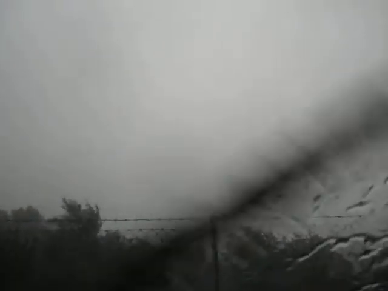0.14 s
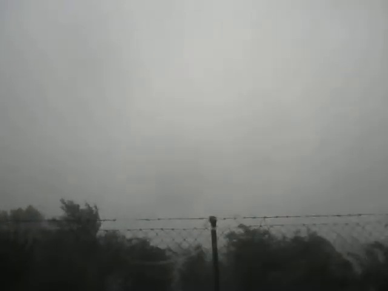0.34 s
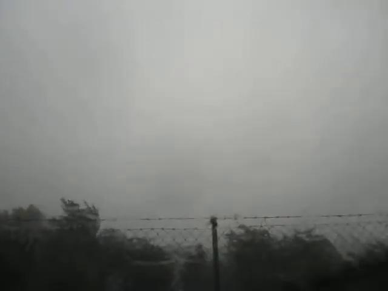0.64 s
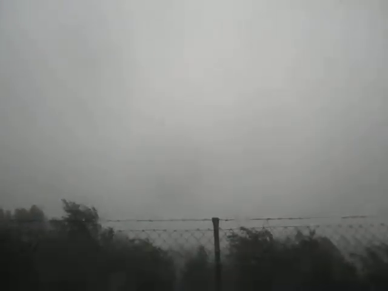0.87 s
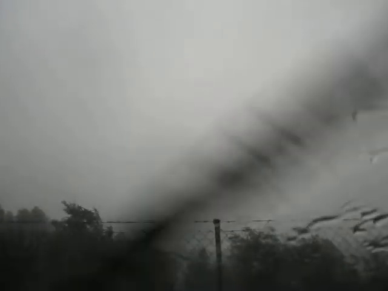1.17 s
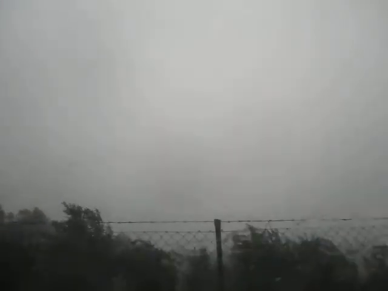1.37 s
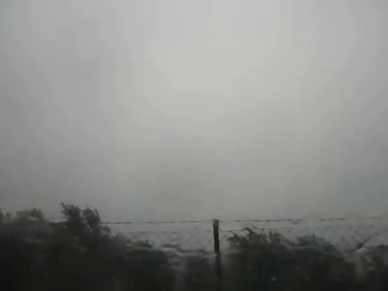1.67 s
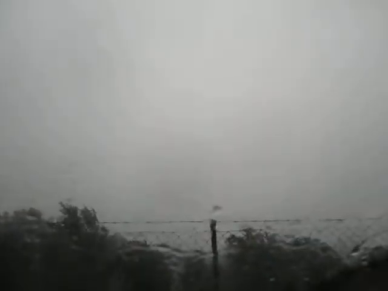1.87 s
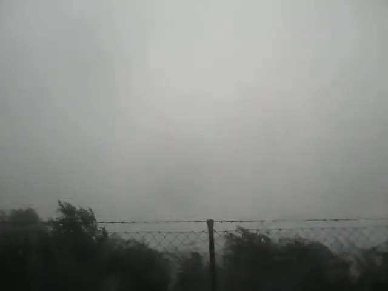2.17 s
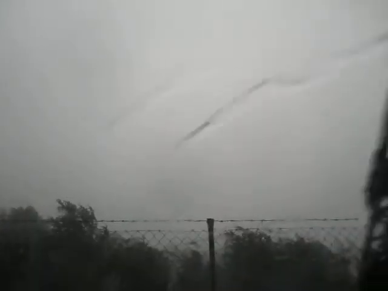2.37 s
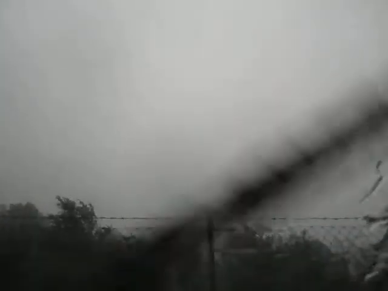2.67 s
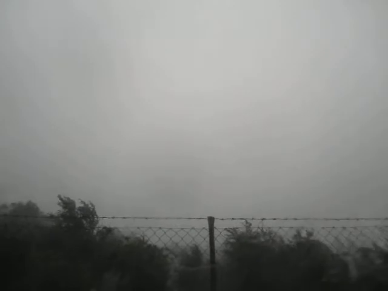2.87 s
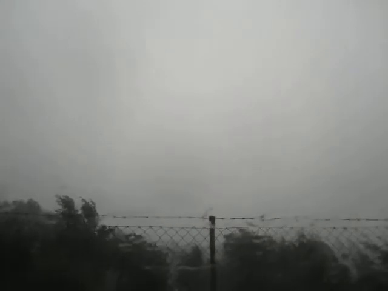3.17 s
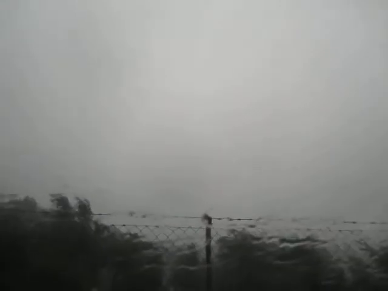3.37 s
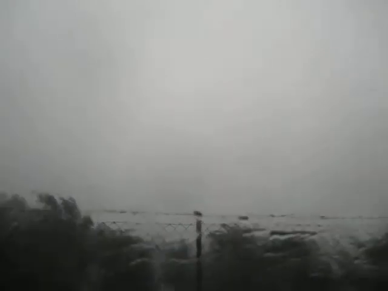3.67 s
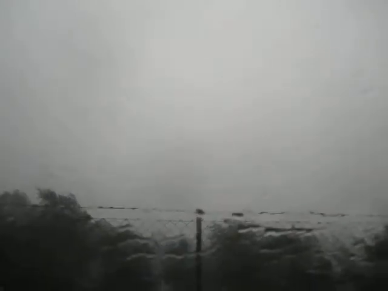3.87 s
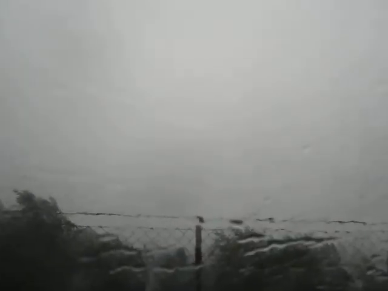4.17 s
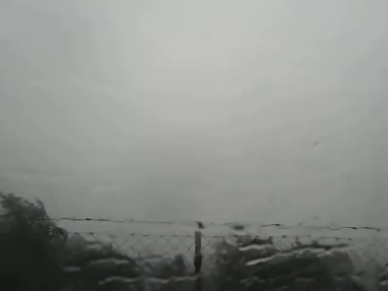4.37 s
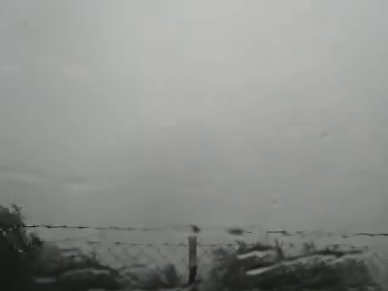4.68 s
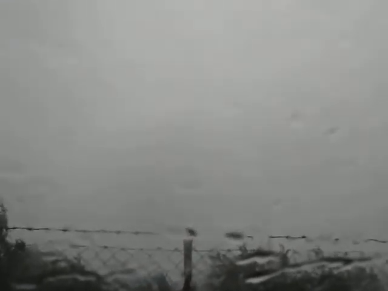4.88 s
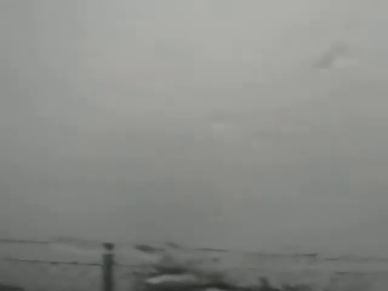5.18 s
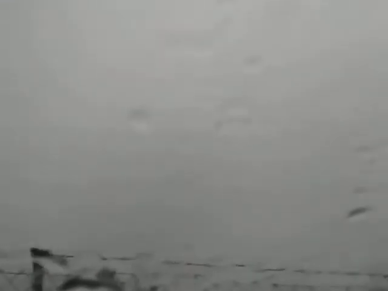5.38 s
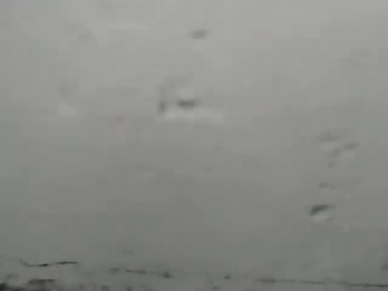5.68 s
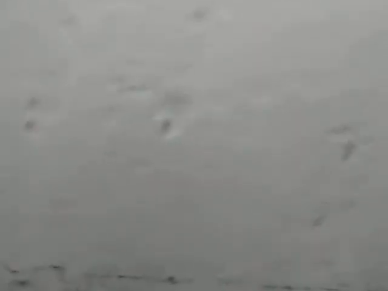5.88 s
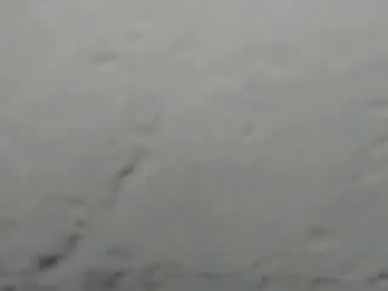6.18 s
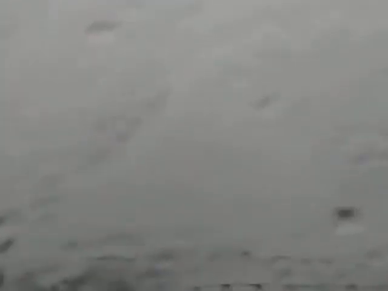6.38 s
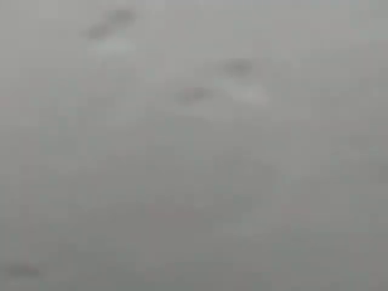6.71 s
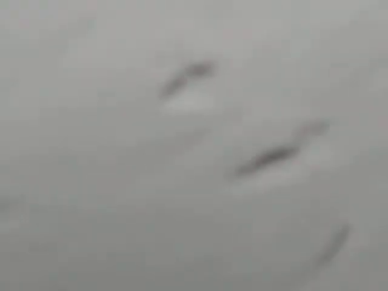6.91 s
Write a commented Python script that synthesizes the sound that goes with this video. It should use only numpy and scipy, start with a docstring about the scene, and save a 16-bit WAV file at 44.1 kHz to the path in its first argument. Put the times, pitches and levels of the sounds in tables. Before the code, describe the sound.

Inside a car, sheets of rain drum on glass and roof while rumbling gusts build into harsh, distorted blasts on the microphone.

```python
"""A storm from inside a parked car, the microphone in the cabin. Sheets of rain drum on glass and roof
while gusts rumble round the body and now and then flutter on the microphone. Near 3.5 s heavy drops smack
down close by and wind overloads the microphone in blunt pops that choke the storm. The rain's sound ducks,
leaving a narrow, dull hiss and two knocks on the trim. Harder blasts break in at 5 and 6 s; with one more
knock and a few last drops, the rain's sound slowly comes back up."""
import sys
import numpy as np
from scipy import signal
from scipy.fft import rfft, irfft
from scipy.io import wavfile
from scipy.ndimage import uniform_filter1d

SR = 44100
rng = np.random.default_rng(int(sys.argv[2]) if len(sys.argv) > 2 else 0)


def digitize_waveform(pressure):
    """Quantize a signal to 16-bit integers and store it at the path in sys.argv[1].

    Rows of a 2-D input are taken as channels; values are limited to [-1, 1].
    """
    field = np.atleast_2d(pressure).T
    bounded = np.clip(field, -1, 1)
    quanta = np.round(bounded * 32767).astype(np.int16)
    wavfile.write(sys.argv[1], SR, quanta)


N = 310772
T = np.arange(N) / SR
FREQS = np.maximum(np.arange(N // 2 + 1) * SR / N, 1)


def rain(drops_per_s=3500, size_spread_db=3.0, patter_share=0.42, spray_hz=2100, steady_spray_db=-12):
    """Overhead, countless drops and their wash ring glass and roof; fine spray brightens the sheets."""
    # the rain's sound, ducking after each hard blast and coming back up: (time [s], relative level [dB])
    levels = [(0, -41.5), (1.0, -38), (1.75, -40), (2.2, -45), (2.6, -37), (3.05, -38), (3.2, -41),
              (3.48, -42.5), (3.65, -56), (4.15, -55.5), (4.6, -54), (5.12, -36.5), (5.28, -63),
              (5.42, -63.5), (5.6, -56), (5.9, -49.5), (6.48, -61), (6.8, -56)]
    # sheets thrown on the glass: (peak time [s], rise [s], fall [s], relative roar [dB], spray [dB])
    sheets = [(.08, 0.12, 0.27, -42.5, -52.5), (.73, 0.13, 0.094, -37, -46.5),
              (1.17, 0.038, 0.038, -39, -44), (1.31, 0.17, 0.19, -38, -47), (1.59, 0.074, 0.15, -37.5, -44),
              (1.73, 0.038, 0.043, -36, -54), (2.35, 0.095, 0.16, -38, -45), (2.49, 0.16, 0.14, -37, -47),
              (2.87, 0.075, .13, -48.5, -49), (5.01, 0.049, .07, -38.5, -47.5),
              (6.991, 0.1, 0.29, -48, -56)]
    # rain as heard in the cabin: (frequency [Hz], gain [dB])
    rain_colour = [(170, -11), (230, -1), (300, -3), (565, -1), (686, -9.5), (800, -6.5), (1120, -5),
                   (1550, -12.5), (2310, -22), (3230, -13.5), (4440, -26), (5480, -31), (7500, -37),
                   (10500, -42), (15500, -66.5)]
    # resonances of glass and roof: (frequency [Hz], width [Hz], boost [dB])
    panels = [(408, 30, 4.5), (593, 140, 2), (784, 210, 3.5), (1163, 99, 4.5), (1833, 480, 4.5),
              (3270, 410, 1.5), (4460, 470, 8), (6280, 720, 5.5)]
    hits = (rng.random(N) < drops_per_s / SR) * rng.standard_normal(N)
    sizes = undb(size_spread_db * np.minimum(rng.exponential(size=N), 4))
    drive = patter_share * unit(hits * sizes) + rng.standard_normal(N)
    resonance_db = sum(db / (1 + (2 * (FREQS - hz) / width) ** 2) for hz, width, db in panels)
    body = colour(rain_colour) * undb(resonance_db)
    treble = 1 / (1 + (spray_hz / FREQS) ** 6)
    roar = shaped(drive, body * (1 - treble)) * undb(2.5 + 0.58 * walk(51))  # both flicker slightly
    spray = shaped(drive, body * treble) * undb(0.92 * walk(39))
    *_, roar_db, spray_db = np.transpose(sheets)
    swells = [swell(s, rise, fall) for s, rise, fall, *_ in sheets]
    steady = undb(curve(levels))
    roar *= strength(swells, roar_db, steady)
    spray *= strength(swells, spray_db, steady * undb(steady_spray_db))
    return roar + spray


def wind(fall_per_rise=1.45):
    """Gusts shake the car's body and boom in the cabin, dying away more slowly than they build."""
    # wind heard under the gusts: (time [s], rumble [dB], cabin boom [dB])
    steady = [(0, -38, -36.5), (.7, -35.5, -33), (1.4, -35, -33.5), (2.2, -39.5, -38), (2.7, -36, -36.5),
              (3.3, -42.5, -35.5), (3.8, -42.5, -48.5), (4.2, -41.5, -48), (4.55, -40.5, -39.5),
              (4.95, -37.5, -44), (5.33, -59, -51), (5.7, -57.5, -55.5), (5.9, -48, -41.5),
              (6.55, -48, -51), (6.8, -45, -49), (7.05, -41, -46.5)]
    # gusts that shove the body: (peak time [s], rise [s], rumble [dB], cabin boom [dB])
    gusts = [(.03, 0.045, -21.5, -31.5), (.52, 0.036, -36, -29.5), (1.064, 0.037, -21.5, -28.5),
             (1.43, 0.021, -21, -29), (1.52, 0.033, -25.5, -42), (1.66, 0.069, -23, -28),
             (1.8, 0.12, -30, -23.5), (1.98, 0.025, -32.5, -24), (2.36, .035, -27.5, -26.5),
             (2.47, 0.062, -26, -31.5), (3.079, 0.018, -34, -27), (3.383, 0.027, -19.5, -39),
             (3.47, 0.062, -22, -44), (3.61, 0.047, -28.5, -31.5), (3.71, 0.019, -27, -55),
             (3.81, 0.064, -34.5, -53), (4.452, 0.017, -28, -33), (5.055, 0.018, -31, -25.5),
             (5.135, 0.032, -27, -23), (5.235, 0.015, -26, -32), (5.545, 0.028, -39, -36),
             (5.98, 0.061, -20, -17.5), (6.18, .04, -24, -32), (6.29, 0.053, -25.5, -28.5),
             (6.635, 0.028, -32, -46.5), (6.73, 0.038, -38, -45)]
    # the shaking body and the booming cabin: (frequency [Hz], gain [dB])
    rumble_colour = [(12, -25.5), (22, 7.5), (36, 4.5), (55, -2.5), (85, -13), (140, -24.5)]
    boom_colour = [(55, -4.5), (80, 0), (105, -0.5), (135, -0.5), (172, 0.5), (205, -4.5), (260, -16),
                   (450, -27)]
    *_, rumble_db, boom_db = np.transpose(gusts)
    swells = [swell(s, rise, fall_per_rise * rise) for s, rise, *_ in gusts]
    rumble = steadied(noise(rumble_colour), 0.05) * strength(swells, rumble_db, undb(curve(steady)))
    boom = steadied(noise(boom_colour), .04) * strength(swells, boom_db, undb(curve(steady, column=2)))
    return rumble + boom


def blasts(ragged_db=3.0, ragged_hz=130, block_at=1.78):
    """Eddies break right on the microphone: a low flutter and a tearing roar that briefly drops out."""
    # wind hitting the microphone: (peak time [s], rise [s], fall [s], flutter [dB], tearing [dB])
    surges = [(1.04, 0.037, 0.017, -27, -42), (1.77, 0.062, 0.084, -35.5, -37),
              (2.44, 0.037, 0.031, -26.5, -37), (3.613, 0.015, 0.022, -28.5, -30),
              (5.05, 0.062, 0.072, -50, -37.5), (5.201, 0.042, 0.018, -13, -11),
              (5.44, 0.058, .08, -48.5, -51), (5.55, 0.043, 0.015, -44, -43.5),
              (5.961, 0.046, 0.1, -23, -24.5), (6.04, 0.022, 0.012, -24, -12),
              (6.11, 0.0097, 0.044, -23, -16.5), (6.24, 0.19, 0.13, -41, -32.5)]
    # low flutter and mid-range tearing: (frequency [Hz], gain [dB])
    flutter_colour = [(45, -3), (90, 3), (140, -1), (215, -7.5), (330, -2), (420, -11.5), (600, -26)]
    tear_colour = [(280, 3), (450, 0), (750, -5.5), (1200, -12.5), (2000, -22.5), (4000, -36), (8000, -52),
                   (15000, -69)]
    eddies = undb(ragged_db * walk(ragged_hz))
    flutter = steadied(noise(flutter_colour) * eddies, 0.039)
    unblocked = 1 / (1 + (steadied(walk(60), .15) / block_at) ** 12)
    tear = steadied(noise(tear_colour) * eddies, 0.033) * unblocked
    *_, flutter_db, tear_db = np.transpose(surges)
    swells = [swell(s, rise, fall) for s, rise, fall, *_ in surges]
    return flutter * strength(swells, flutter_db) + tear * strength(swells, tear_db)


def pops(rebound=0.34, rebound_ms=2.04, rebound_width_ms=1.23, stall_ms=12):
    """Each eddy sucks the diaphragm out; it swings back and stalls a moment. Returns sound and stall."""
    # the loudest wind pops and those that stand alone: (time [s], level [dB], rise [ms])
    main_pops = [(3.5175, 2, 0.28), (3.5582, -2, 0.077), (3.6009, -17.5, 0.4), (4.9743, -7.5, 0.79),
                 (5.0249, -8, 1.3), (5.053, -13, .6), (5.1187, -1.5, 0.53), (5.1445, -1.5, 0.28),
                 (5.1646, -1.5, 0.52), (5.171, -1.5, 0.46), (5.1729, -4.5, 0.039), (5.1761, -2, .15),
                 (5.179, -2.5, .038), (5.1882, -3.5, 0.07), (5.1998, -5, 0.12), (5.2137, -8.5, 0.12),
                 (5.3675, -28.5, .21), (5.3815, -28, 0.22), (5.403, -29, 0.1), (5.4239, -30, 0.093),
                 (5.5382, -14.5, 0.16), (5.548, -14.5, 0.079), (5.9424, -14, .8), (5.9529, -8.5, 1.1),
                 (5.9745, -11, 1.1), (6.0155, 2, 0.3), (6.0226, -5.5, 0.095), (6.0316, -3, 0.07),
                 (6.037, -8, 0.022), (6.0402, 0.5, 0.12), (6.046, -9.5, 0.17), (6.0507, -9, 0.12),
                 (6.105, -8.5, 0.28), (6.1158, -7.5, 0.18), (6.1715, -17, 2.7), (6.1978, -9.5, 2.5),
                 (6.2718, -12, 3.1)]
    out, stall = np.zeros(N), np.zeros(N)
    lead_s = .004
    ms = (np.arange(SR // 10) / SR - lead_s) * 1000
    for s, db, rise_ms in main_pops + sputter():
        length_ms = 0.67 + 0.83 * rise_ms  # blunter pops last longer
        front = .5 + .5 * np.tanh(2 * ms / rise_ms)
        suck = front * np.exp(-(np.maximum(ms, 0) / (1.03 * length_ms)) ** 2)
        swing = np.exp(-((ms - length_ms / 2 - rebound_ms) / (rebound_width_ms + length_ms / 2)) ** 2)
        add(out, s - lead_s, undb(db) * (rebound * swing - suck / suck.max()))
        add(stall, s - lead_s, undb(db) * front * np.exp(-np.maximum(ms, 0) / stall_ms))
    return out, stall


def sputter(jitter=.25, scatter_db=1.5, rise_scatter=.3):
    """Eddies shed at an uneven pace give lesser pops: rows of (time [s], level [dB], rise [ms])."""
    # runs of pops: (start [s], end [s], rate [1/s], level [dB], rise [ms])
    runs = [(5.184, 5.21, 110, -8.5, 0.086), (5.218, 5.228, 270, -19.5, 0.18),
            (5.479, 5.506, 125, -26.5, .12), (5.924, 6.014, 60, -31.5, 0.044),
            (6.132, 6.32, 100, -37.5, 0.033)]
    rows = []
    for start, end, rate, db, rise in runs:
        chance = rng.standard_normal((64, 3))
        for s, (late, loud, blunt) in zip(np.arange(start, end, 1 / rate), chance):
            rows.append((s + jitter * late / rate, db + scatter_db * loud,
                         rise * np.exp(rise_scatter * blunt)))
    return rows


def drops(ring_db=-20, splash_db=-30, splash_s=0.015, slap_db=-15, slap_hz=3000):
    """Heavy drops close by: a sharp smack over a duller slap, a little splash and a short ring."""
    # impacts: (time [s], level [dB], low edge [Hz], high edge [Hz], decay [ms])
    impacts = [(3.404, -19.5, 4170, 8700, 0.84), (3.407, -20, 1390, 2780, 0.99),
               (3.419, -10, 1880, 8800, 0.99), (3.422, -14, 4880, 7300, 0.96),
               (3.696, -45, 4180, 8500, 0.55), (3.793, -41, 4300, 9900, 0.46),
               (3.809, -27, 3840, 8350, 0.31), (3.832, -27.5, 3440, 8000, 0.33),
               (6.6794, -17, 1420, 3830, 0.54), (6.7048, -16, 4240, 6840, 0.44),
               (6.705, -17, 1020, 3800, 0.34), (6.8842, -25, 4900, 8200, 1.1),
               (6.885, -28.5, 2300, 3480, 0.77)]
    # ring of the struck surface: (frequency [Hz], gain [dB], t60 [s])
    surface_modes = [(1500, -6.5, 0.016), (1784, 2.5, 0.041), (1910, 0, 0.038), (2100, 0.5, .025),
                     (3200, 2.5, .015), (4640, -16.5, .11), (5450, -5, 0.013), (5800, -2, 0.015),
                     (6400, -7, 0.014), (7230, -20, .03)]
    out, t = np.zeros(N), np.arange(SR // 8) / SR
    ms = 1000 * t
    for s, db, low_hz, high_hz, decay_ms in impacts:
        envelope = np.exp(-ms / decay_ms) + undb(splash_db) * np.exp(-t / splash_s)
        burst = rng.standard_normal(len(t)) * envelope
        smack = signal.sosfilt(signal.butter(4, [low_hz, high_hz], "band", fs=SR, output="sos"), burst)
        slap = signal.sosfilt(signal.butter(3, slap_hz, fs=SR, output="sos"), burst)
        hit = smack + undb(slap_db) * slap
        peak = 1.98 * np.sqrt(np.sum(hit ** 2) / np.sum(ms < decay_ms))  # usual crest of a short burst
        add(out, s, undb(db) * (hit / peak + undb(ring_db) * ring(surface_modes, t)))
    return out


def knocks():
    """Dull knocks on the car's trim; a softer contact leaves the upper modes still."""
    # blows: (time [s], peak [dB], cutoff of the soft contact [Hz])
    blows = [(3.81, -18, 1300), (4.610, -23.5, 480), (6.616, -25, 890)]
    # ring of the trim: (frequency [Hz], gain [dB], t60 [s])
    trim_modes = [(217, -13, 0.037), (375, 1.5, 0.11), (465, 7.5, 0.041), (610, 2, 0.031),
                  (800, 5.5, 0.024), (920, 6, 0.03), (1004, 2, .035)]
    out, t = np.zeros(N), np.arange(SR // 6) / SR
    for s, db, top_hz in blows:
        thud = signal.sosfilt(signal.butter(2, top_hz, fs=SR, output="sos"), ring(trim_modes, t))
        add(out, s, undb(db) * thud / abs(thud).max())
    return out


def dull_hiss():
    """A narrow, dull hiss reaching up to about 2 kHz, heard between the blasts."""
    # its rise and fall: (time [s], level [dB])
    levels = [(3.6, -63), (3.85, -59.5), (4.1, -55), (4.5, -52.5), (4.9, -52.5), (5.15, -67), (5.3, -83)]
    # its narrow band: (frequency [Hz], gain [dB])
    hiss_colour = [(700, -16), (900, -1.5), (1250, -6), (1600, -2.5), (1880, 1), (2020, -17), (2200, -32)]
    return noise(hiss_colour) * undb(curve(levels, outside=-120))


def air():
    """A fine airy hiss lies behind everything."""
    # hiss dipping after the hard blasts: (time [s], level [dB])
    levels = [(0, -62.5), (3.45, -62.5), (3.6, -76), (4.1, -67.5), (4.6, -64), (5.15, -65), (5.26, -85),
              (5.8, -73.5), (6.45, -75.5), (7.05, -70)]
    # its treble slope: (frequency [Hz], gain [dB])
    air_colour = [(2000, 8), (5000, -1), (8000, -4), (11000, -8), (15800, -10.5)]
    return noise(air_colour) * undb(curve(levels))


def undb(db):
    """Decibels to gain."""
    return 10 ** (np.asarray(db) / 20)


def unit(x):
    """Scale to rms 1."""
    return x / np.std(x)


def curve(rows, column=1, outside=None, fade_s=.03):
    """A table column joined by straight lines in time; past its ends it fades to outside, if given."""
    s, value = np.array(rows)[:, 0], np.array(rows)[:, column]
    if outside is not None:
        s, value = np.r_[s[0] - fade_s, s, s[-1] + fade_s], np.r_[outside, value, outside]
    return np.interp(T, s, value)


def swell(s, rise_s, fall_s):
    """A bell-shaped rise and fall that reaches 1 at time s."""
    return np.exp(-((T - s) / np.where(T < s, rise_s, fall_s)) ** 2)


def strength(swells, levels_db, steady=0):
    """Gain of several swells over a steady part; their powers add."""
    return np.sqrt(steady ** 2 + sum((shape * undb(db)) ** 2 for shape, db in zip(swells, levels_db)))


def colour(points):
    """Gain per frequency from (frequency [Hz], gain [dB]) points, falling steeply past both ends."""
    hz, db = np.transpose(points)
    ends = np.minimum(FREQS / hz[0], 1) * np.minimum(hz[-1] / FREQS, 1)
    return undb(np.interp(np.log(FREQS), np.log(hz), db)) * ends ** 4


def shaped(x, gain):
    """Filter by a gain per frequency; rms 1."""
    return unit(irfft(rfft(x) * gain, N))


def noise(points):
    """Noise of a given colour; rms 1."""
    return shaped(rng.standard_normal(N), colour(points))


def walk(rate):
    """Smooth random drift of rms 1 that changes about rate times a second."""
    return shaped(rng.standard_normal(N), np.exp(-(FREQS / rate) ** 2))


def steadied(x, span_s):
    """Even out the chance swells of a noise, so that the gusts set its strength."""
    return unit(x / np.sqrt(uniform_filter1d(x * x, int(span_s * SR)) + 1e-6))


def ring(modes, t, detune=.008):
    """Sum of fading modes, each a little off pitch for every blow."""
    out = np.zeros(len(t))
    for hz, db, t60 in modes:
        pitch_hz = hz * (1 + detune * rng.standard_normal())
        out += undb(db) * np.sin(2 * np.pi * pitch_hz * t) * np.exp(-np.log(1000) * t / t60)
    return out


def add(out, s, sound):
    """Mix a short sound in at time s."""
    start = int(s * SR)
    out[start:start + len(sound)] += sound[:N - start]


def scene(choke=2.12):
    """The storm at one microphone in the cabin, choked wherever a pop stalls the diaphragm."""
    thumps, stall = pops()
    storm = air() + rain() + wind() + dull_hiss() + blasts()
    choked = storm / (1 + (choke * stall) ** 2)
    return (choked + thumps + drops() + knocks())[None]


def record(dry, ceiling=.71, top_hz=15900):
    """The input clips the hardest pops, and a steep low-pass cuts the top."""
    clipped = np.clip(dry, -ceiling, ceiling)
    return signal.sosfilt(signal.ellip(8, .2, 70, top_hz, fs=SR, output="sos"), clipped)


dry = scene()
out = record(dry)
digitize_waveform(out)
```